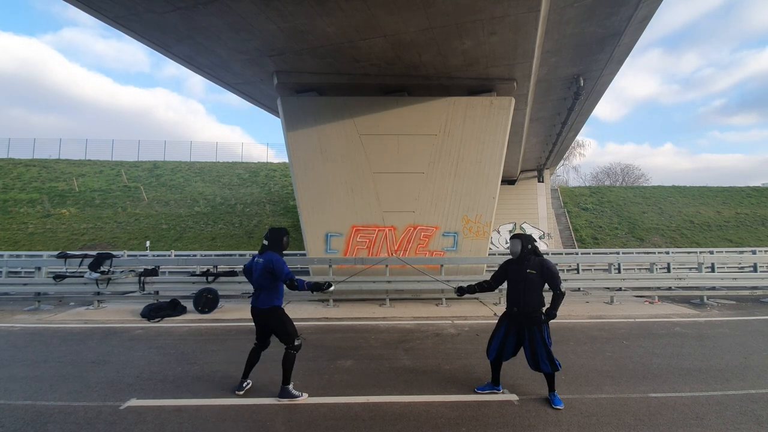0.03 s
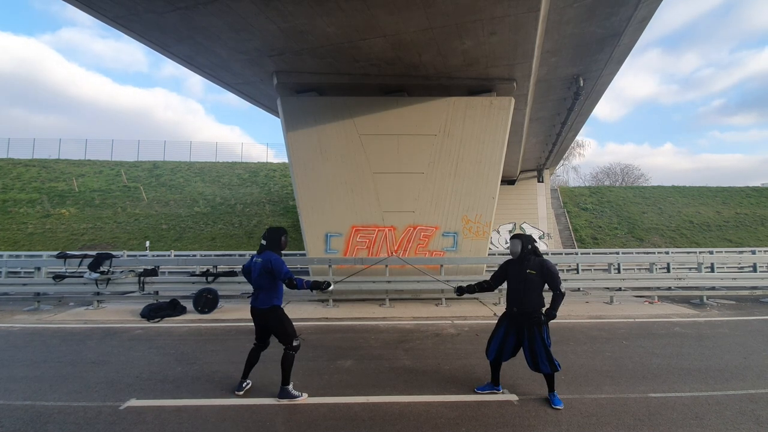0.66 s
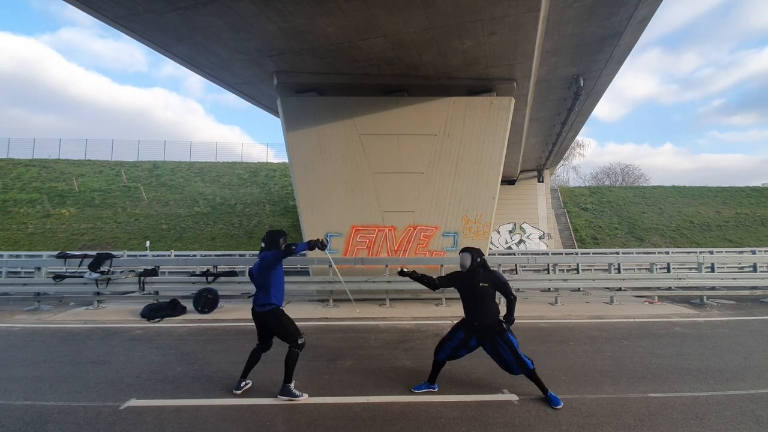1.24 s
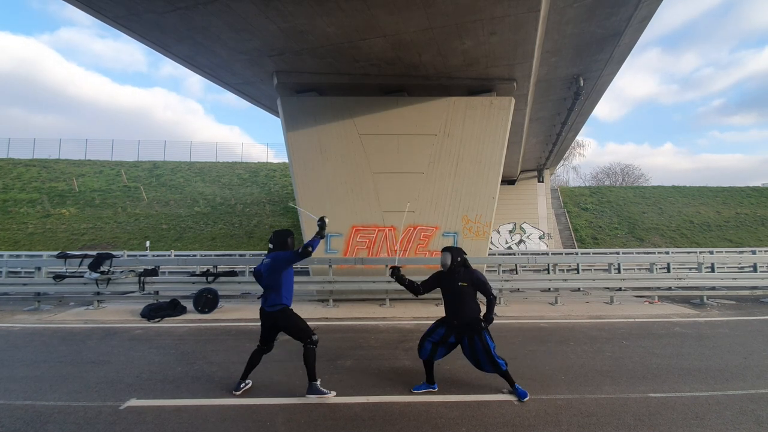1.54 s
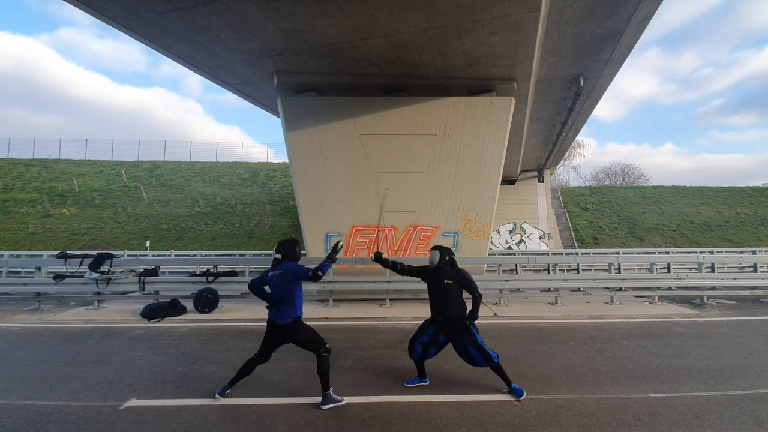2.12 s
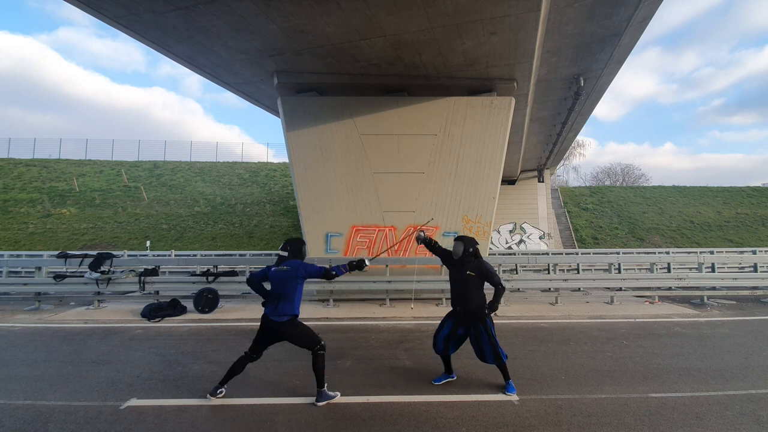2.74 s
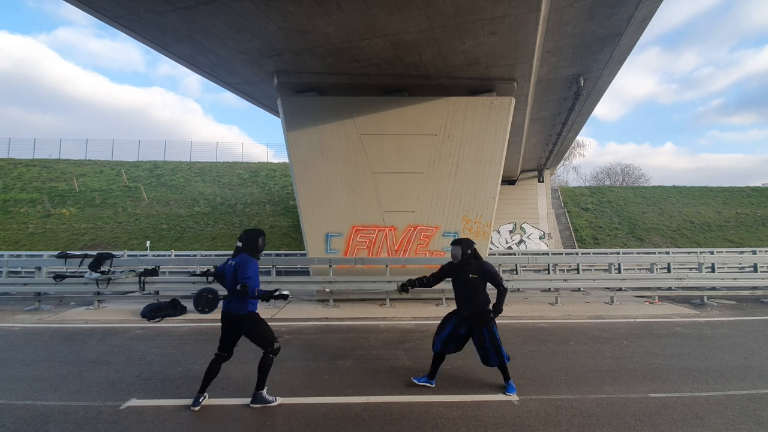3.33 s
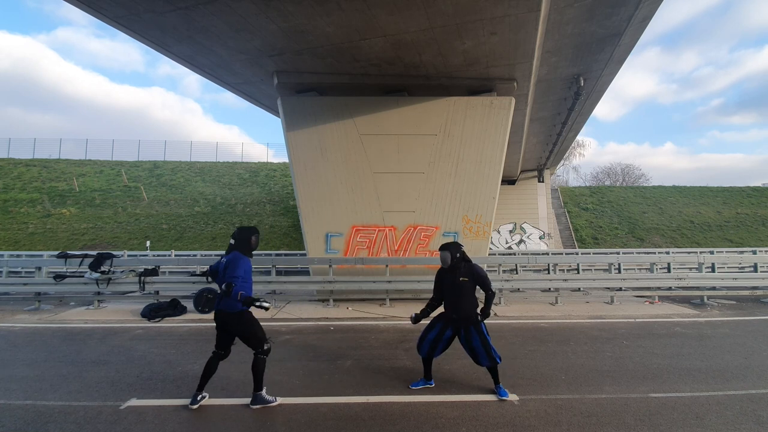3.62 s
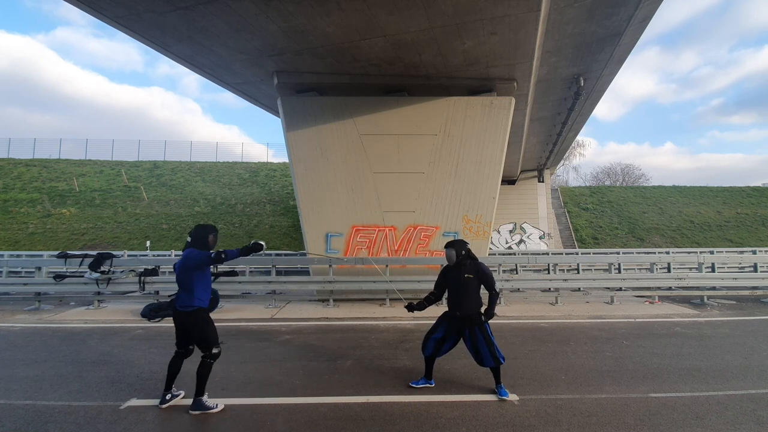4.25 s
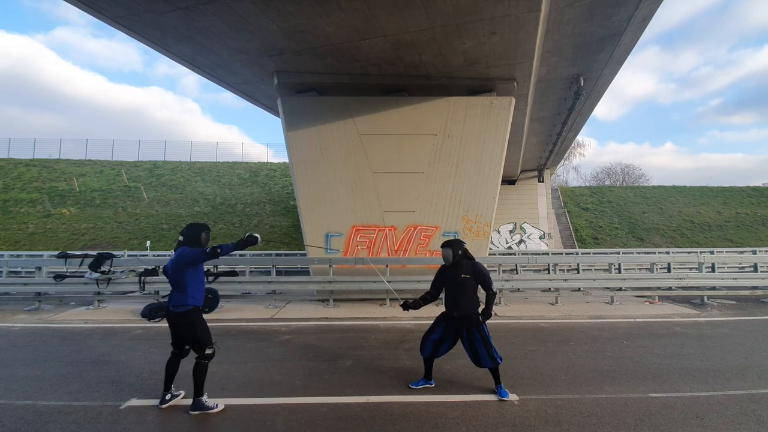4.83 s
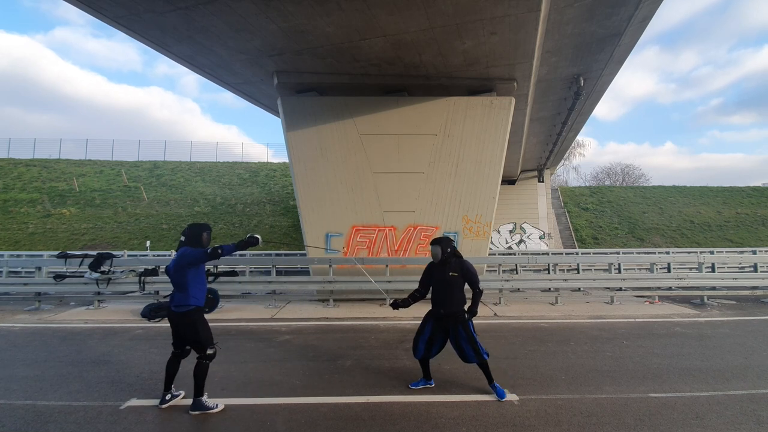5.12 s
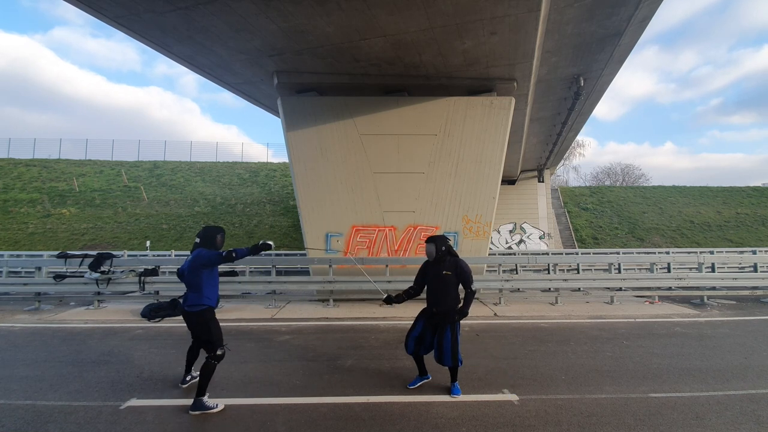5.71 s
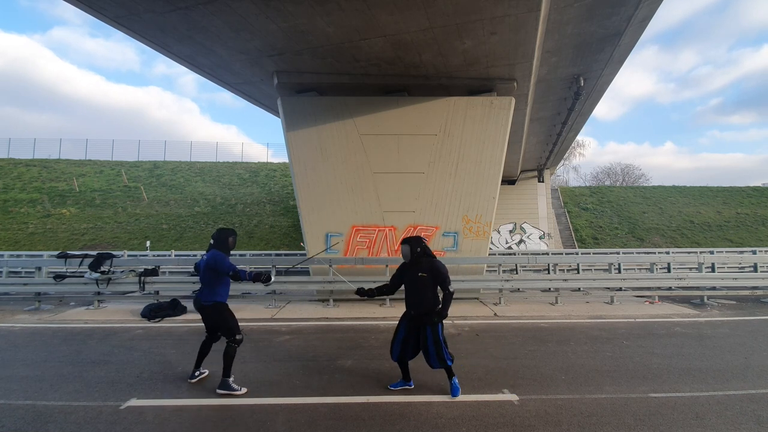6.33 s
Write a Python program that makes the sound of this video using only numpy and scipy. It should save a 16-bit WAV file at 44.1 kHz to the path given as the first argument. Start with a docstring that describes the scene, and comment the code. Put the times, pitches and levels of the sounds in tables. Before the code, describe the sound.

Steel sabres clash and ring briefly under a bridge, with shoes stamping and scuffing and wind buffeting the microphone.

```python
"""Sabre fencing under a bridge

Two fencers spar on the asphalt under a concrete road bridge. Their steel blades grind, snap and
ring briefly, shoes stamp and scuff, jackets swish, and the deck and pier throw the sound back.
Wind buffets the microphone over a faint wash of far traffic."""
import sys
import numpy as np
from scipy import signal
from scipy.fft import rfft, irfft, next_fast_len
from scipy.io import wavfile
from scipy.ndimage import uniform_filter1d

SR = 44100
rng = np.random.default_rng(int(sys.argv[2]) if len(sys.argv) > 2 else 0)


def unload_wav(signal):
    """Save mono or channel-first audio to the path in sys.argv[1] as 16-bit WAV at rate SR, clipped to [-1, 1]."""
    wavfile.write(
        sys.argv[1],
        SR,
        np.round(np.clip(np.atleast_2d(signal).T, -1, 1) * 32767).astype(np.int16),
    )


N = 280900
TIME = np.arange(N) / SR
EDGES_HZ = np.r_[np.geomspace(110, 820, 8), np.geomspace(1000, 17000, 17)]
BAND_HZ = np.sqrt(EDGES_HZ[1:] * EDGES_HZ[:-1])
BAND_FILTERS = [signal.butter(2, pair, "band", fs=SR, output="sos")
                for pair in zip(EDGES_HZ, EDGES_HZ[1:])]
OPPOSITE = np.array([[1], [-1]])   # plus on the left, minus on the right


def from_db(db):
    """Turn decibels into a gain."""
    return 10 ** (np.asarray(db) / 20)


def at_hz(points, hz):
    """Read between rows of (Hz, value) on a log-frequency axis."""
    table = np.array(points)
    return np.interp(np.log(hz), np.log(table[:, 0]), table[:, 1])


def rms_one(x):
    """Scale to an average strength (rms) of 1."""
    return x / np.sqrt(np.mean(x ** 2) + 1e-20)


def add(track, s, sound):
    """Mix a sound into a track, starting at s seconds."""
    start = int(np.clip(round(s * SR), 0, N - 1))
    track[:, start:start + sound.shape[1]] += sound[:, :N - start]


def flicker(rate_hz, size):
    """A smooth random wobble between -2 and 2."""
    slow = signal.sosfilt(signal.butter(2, rate_hz, fs=SR, output="sos"), rng.standard_normal(size))
    return np.clip(rms_one(slow), -2, 2)


def swell(rise, decay):
    """A straight rise and an exponential fall, timed in seconds."""
    t = TIME[:int((rise + 5 * decay + .02) * SR)]
    return np.minimum(t / rise, 1) * np.exp(-np.maximum(t - rise, 0) / decay)


def stereo(mid, side, likeness):
    """Blend two noises into left and right: likeness 1 is identical, 0 unrelated."""
    return np.sqrt(1 + likeness) * mid + np.sqrt(1 - likeness) * side * OPPOSITE


# How alike left and right are under the bridge. Each row: frequency in Hz, likeness from 0 to 1.
LIKENESS = [(100, 1), (700, 0.89), (1500, 0.82), (2000, 0.63), (2800, 0.66), (5600, 0.52), (10000, .17),
            (15000, 0.043)]

def noise_bands(envelope):
    """Stereo noise under an envelope, in bands that each hold the energy a unit click has there."""
    white = rng.standard_normal((2, 2, len(envelope))) * envelope + 1e-18
    bands = []
    for k, sos in enumerate(BAND_FILTERS):
        mid, side = map(rms_one, signal.sosfilt(sos, white[k % 2]))
        gain = np.sqrt((EDGES_HZ[k + 1] - EDGES_HZ[k]) / SR / len(envelope))
        bands.append(gain * stereo(mid, side, at_hz(LIKENESS, BAND_HZ[k])))
    return np.array(bands)


def burst(envelope, band_db):
    """Noise with a given shape in time and a level for each band."""
    return np.tensordot(from_db(band_db), noise_bands(envelope), 1)


def airflow(spectrum, likeness, lump_db=0.0, lump_hz=35):
    """Lasting noise of rms 1; lump_db makes it come in lumps, as when swirls of air pass."""
    size = next_fast_len(N, True)
    white = rng.standard_normal((2, N)) * from_db(lump_db * flicker(lump_hz, N))
    hz = np.maximum(np.fft.rfftfreq(size, 1 / SR), 1)
    mid, side = irfft(rfft(white, size) * from_db(at_hz(spectrum, hz)), size)[:, :N]
    return rms_one(stereo(mid, side, likeness))


# The tone of far traffic. Each row: frequency in Hz, relative level in dB.
TRAFFIC_TONE = [(150, -12), (300, -5), (500, -12), (750, -11), (1150, -14), (1600, -22.5), (2400, -31),
                (3300, -30), (5000, -42), (8000, -40.5), (15000, -40)]

def traffic(level_db=-64.5):
    """Far vehicles blur into one steady, dull wash."""
    return from_db(level_db) * airflow(TRAFFIC_TONE, likeness=0.23)


# Gusts that bump the microphone. Each row: time of the crest in seconds, time to build and to die
# in seconds, relative levels of buffeting and of flutter in dB.
GUSTS = [(.2, .08, -42.5, -59), (.352, 0.022, -33.5, -47), (0.486, 0.026, -36.5, -47),
         (.725, 0.055, -38, -47), (1.24, 0.032, -48, -40), (1.35, 0.022, -34.5, -45.5),
         (1.5, 0.067, -39.5, -40.5), (1.665, 0.021, -32, -40), (1.815, 0.022, -39, -54),
         (2.21, 0.027, -45, -50.5), (2.755, 0.034, -40.5, -50), (3.023, 0.023, -31, -45),
         (3.35, 0.14, -46.5, -58), (3.64, 0.058, -42.5, -56), (3.98, 0.083, -45, -51),
         (4.195, 0.018, -38.5, -55), (4.46, 0.028, -39.5, -54), (4.876, 0.039, -36, -51.5),
         (5.369, .04, -40, -55), (5.56, 0.029, -34.5, -48), (5.745, 0.044, -30.5, -44.5),
         (5.95, 0.062, -38, -48), (6.199, 0.046, -36, -46)]

def gusts(boost_db=2):
    """Each gust swells and dies like a bell curve; gives the strength of buffeting and of flutter."""
    power = np.zeros((2, N))
    for crest, width, buffet_db, flutter_db in GUSTS:
        bell = np.exp(-np.minimum(abs(TIME - crest) / width, 10) ** 2)
        power += (from_db([[buffet_db], [flutter_db]]) * bell) ** 2
    return from_db(boost_db) * np.sqrt(power)


# The tones of big swirls (buffeting) and small ones (flutter).
# Each row: frequency in Hz, relative level in dB.
BUFFET_TONE = [(20, -14.5), (35, -4.5), (60, 4), (85, 3), (115, -3.5), (160, -14.5), (260, -45),
               (500, -71.5)]
FLUTTER_TONE = [(60, -22), (110, -7), (150, -2.5), (220, -7), (320, -8.5), (480, -19), (800, -38),
                (2000, -61.5), (4000, -83.5)]
# The breeze between gusts. Each row: time in seconds, relative levels of buffeting and flutter in dB.
BREEZE = [(0.0, -49, -54.5), (0.62, -48, -52.5), (0.85, -59, -68), (1.08, -52, -64), (1.45, -46, -54),
          (1.67, -47, -53), (1.9, -52.5, -61.5), (3.39, -54.5, -63), (3.92, -61, -68), (4.54, -47, -60),
          (4.95, -51, -61), (5.78, -43.5, -57.5), (6.14, -51, -63.5), (6.37, -47, -57.5)]

def wind(breeze_boost_db=4, smooth_s=0.065, pans_db=(-0.06, 0.65)):
    """Big and small swirls of air hit the microphone; breeze and gusts set their strength."""
    times, *breezes_db = np.transpose(BREEZE)
    buffet = airflow(BUFFET_TONE, likeness=0.27, lump_db=6.0, lump_hz=22)
    flutter = airflow(FLUTTER_TONE, likeness=0.011, lump_db=5.5, lump_hz=33)
    out = np.zeros((2, N))
    for swirls, breeze_db, gust, pan_db in zip((buffet, flutter), breezes_db, gusts(), pans_db):
        breeze = from_db(np.interp(TIME, times, breeze_db) + breeze_boost_db)
        power = uniform_filter1d(np.mean(swirls ** 2, axis=0), int(smooth_s * SR))
        evened = swirls / np.sqrt(power + 1e-12)
        out += evened * np.hypot(breeze, gust) * from_db(pan_db * OPPOSITE)
    return out


# How long the first reflections and the lingering tail last.
# Each row: frequency in Hz, seconds to fade by 60 dB.
EARLY_FADE = [(200, 0.73), (1500, 0.54), (4000, 0.56), (8000, 0.38), (15000, 0.24)]
LATE_FADE = [(200, 3.4), (700, 1.72), (1500, 1.14), (3000, 0.95), (4200, 0.53), (6000, .68), (15000, 0.5)]

def bridge(x, delay_s=0.017, build_s=0.0043, gap_db=-14, wet_db=17, late_db=-14, stretches=12):
    """Dense reflections from deck, pier and road build up and die, the treble first."""
    t = TIME[:SR]
    early = from_db(-60 * t / at_hz(EARLY_FADE, BAND_HZ)[:, None])
    late = from_db(late_db - 60 * t / at_hz(LATE_FADE, BAND_HZ)[:, None])
    arrived = np.maximum(from_db(gap_db), .5 + .5 * np.tanh((t - delay_s) / build_s))
    envelope = from_db(wet_db) * np.hypot(early, late) * arrived
    bunches = from_db(1.43 * flicker(rate_hz=220, size=SR))   # few walls: reflections come in bunches
    reflections = np.tile(noise_bands(bunches), 2)
    out = np.zeros((2, N))
    # the fencers keep moving, so each stretch of time meets another pattern of reflections
    shifts = np.linspace(0, SR, stretches).astype(int)
    for shift, part in zip(shifts, np.array_split(np.arange(N), stretches)):
        response = np.einsum("bct,bt->ct", reflections[:, :, shift:shift + SR], envelope)
        add(out, part[0] / SR, signal.fftconvolve(x[:1, part], response, axes=1))
    return out


# Single echoes. Each row: delay in seconds, gain in dB.
ECHOES = [(0.0163, -11.5), (0.0412, -15.5)]

def echoes(x):
    """Hard surfaces nearby each return one distinct copy."""
    out = np.zeros((2, N))
    for delay, db in ECHOES:
        add(out, delay, from_db(db) * x)
    return out


# The tone of sliding cloth. Each row: frequency in Hz, relative level in dB.
CLOTH_TONE = [(300, -3), (1200, 5.5), (3000, -1), (4200, -10), (5200, -5.5), (8000, -12), (10500, -9.5),
              (15000, -7)]
# Arm movements. Each row: start in seconds, relative level in dB, rise and decay in seconds.
SWISHES = [(1.018, -22.5, 0.29, 0.031), (4.42, -31.5, 0.14, 0.17), (5.07, -21.5, 0.081, 0.18),
           (5.998, -25.5, 0.0025, 0.12)]

def jackets():
    """Padded jackets slide and swish as the arms move."""
    out = np.zeros((2, N))
    for start, db, rise, decay in SWISHES:
        add(out, start, burst(swell(rise, decay), db + at_hz(CLOTH_TONE, BAND_HZ)))
    return out


# The tone of a sole on asphalt. Each row: frequency in Hz, relative level in dB.
SOLE_TONE = [(80, -13), (250, -13), (420, -1.5), (700, -3.5), (980, -2.5), (1280, -1), (1650, -2),
             (2400, -2.5), (3100, 1.5), (4200, -5.5), (6000, 1), (9500, -0.5), (15000, 0.5)]
# Short stamps and long scuffs. Each row: start in seconds, thud in dB, pitch of the hollow under
# the sole in Hz, slap in dB, decay in seconds. Thud and slap are added to the sole's tone.
STEPS = [(.648, -7, 440, -46, 0.02), (1.181, -7, 875, -45, .0076), (1.211, -13, 378, -43, 0.032),
         (1.2548, -6, 805, -9, 0.0029), (1.729, -0.5, 790, -6, .004), (1.754, -2.5, 810, -9, 0.0029),
         (2.572, -0.5, 600, -1.5, .0025), (2.613, -4.5, 533, -20, .022), (3.144, -1.5, 603, 1, 0.0097),
         (3.158, 14, 810, 8.5, 0.063), (3.606, 4.5, 620, 4.5, 0.01), (3.843, 2, 449, -40, .005),
         (3.872, -8, 509, -33, .035), (4.057, -3, 614, -18.5, .012), (4.192, -6.5, 900, -13.5, 0.024),
         (5.274, 9, 730, 5, 0.027), (5.831, -10.5, 600, -10.5, 0.022), (5.86, -8.5, 693, -4.5, .005),
         (6.187, 2.5, 580, -9, 0.017), (6.216, 0, 610, -2.5, .03)]

def footsteps(hollow_db=5, hollow_octaves=0.24, full_slide_s=0.012):
    """A step is the thud of the heel, the slap of the sole and the grit under it."""
    out = np.zeros((2, N))
    for start, thud_db, hollow_hz, slap_db, decay in STEPS:
        dragged = min(decay / full_slide_s, 1)   # a shorter contact drags less grit along
        grit_db = -23 + 0.59 * slap_db + 20 * np.log10(dragged)   # grit crunches with the slap
        balance = [(700, thud_db), (2000, slap_db), (7000, grit_db)]
        hollow = hollow_db * np.exp(-(np.log2(BAND_HZ / hollow_hz) / hollow_octaves) ** 2)
        band_db = at_hz(SOLE_TONE, BAND_HZ) + at_hz(balance, BAND_HZ) + hollow
        rise = .35 * decay   # a sole that slides longer takes longer to grip
        add(out, start, burst(swell(rise, decay), band_db))
    return out


# Snaps of the blade edges. Each row: start in seconds, relative level in dB, centre frequency in Hz,
# decay in seconds.
BITES = [(1.3095, 17.5, 13900, 0.0019), (1.7912, 15, 10000, 0.0021), (1.803, 19, 14000, .001),
         (2.1792, 23, 3220, .002), (3.2835, 22.5, 12050, 0.0022), (3.299, 11.5, 6500, 0.0023),
         (3.325, 9.5, 8650, 0.0019), (3.376, 13.5, 2360, 0.017), (6.266, 5, 15000, 0.0038)]

def edge_bites(width_octaves=0.36, off_peak_db=-17, bass_db=-30):
    """One edge bites into the other with a bright snap."""
    out = np.zeros((2, N))
    for start, db, hz, decay in BITES:
        peak = np.exp(-(np.log2(BAND_HZ / hz) / width_octaves) ** 2)
        band_db = db + off_peak_db * (1 - peak) + bass_db * (BAND_HZ < 1000)
        add(out, start, burst(swell(0.00016, decay), band_db))
    return out


# The blades' own notes. Each row: pitch in Hz, relative level in dB, seconds to fade by 60 dB.
BLADE_NOTES = [(1081, -0.5, 0.19), (1202, -3.5, 0.26), (1272, 1, 0.16), (1505, -2.5, 0.18),
               (1650, -2.5, 0.14), (1746, -4.5, 0.18), (1882, -0.5, 0.59), (1918, -2, 0.32),
               (1960, 1.5, .2), (2560, -2.5, 0.16), (2663, 1, 0.22), (2840, -4.5, .22), (3040, -0.5, 0.3),
               (3280, -5, 0.12), (3530, -6.5, 0.077), (4140, 3, 0.072), (4370, -3, 0.29), (5526, 4, 0.073),
               (6610, -2.5, 0.09), (6980, 7, .05), (7680, -2.5, 0.053), (8970, 1, 0.04),
               (10790, -4.5, 0.045), (12800, 0.5, 0.029), (13740, -3, 0.044), (14230, 0, .04),
               (14460, 1.5, .05), (15000, -1, .04)]

def blade_ring(colour, favoured_hz, extra_db, ring_db=-50.0, spread_db=1.25):
    """Every blow wakes all the notes; where it lands on the blade decides which ones sing out."""
    hz, note_db, fade_s = np.transpose(BLADE_NOTES)
    singing = np.isin(np.arange(len(hz)), [np.argmin(abs(hz - pitch)) for pitch in favoured_hz])
    chance_db = spread_db * rng.standard_normal(len(hz))
    strength = from_db(ring_db + note_db + at_hz(colour, hz) + extra_db * singing + chance_db)
    stereo_shift = np.arccos(at_hz(LIKENESS, hz)) / 2 * rng.choice([-1, 1], len(hz))
    phases = rng.uniform(0, 2 * np.pi, len(hz)) + stereo_shift * OPPOSITE
    fading_notes = np.exp(np.outer(2j * np.pi * hz - np.log(1000) / fade_s, TIME[:SR // 4]))
    return ((strength * np.exp(1j * phases)) @ fading_notes).imag


def clack(band_db, size=512):
    """A crash summed over all directions: its peaks and holes even out into one smooth pulse."""
    gain = from_db(np.interp(np.fft.rfftfreq(size, 1 / SR), BAND_HZ, band_db))
    return np.roll(irfft(gain), size // 4)[None]


# The tone of steel hitting steel. Each row: frequency in Hz, relative level in dB.
CRASH_TONE = [(100, -36.5), (300, -17), (550, -8.5), (850, -10), (1200, 1), (1900, 5), (2600, 1.5),
              (3600, 1), (5200, -3), (8200, -6.5), (9600, -5), (12000, -4), (15000, -3.5)]
# Blade on blade. Each row: start in seconds, relative level in dB, extra bass and treble in dB,
# contact time in seconds, gain towards the microphone in dB, two favoured pitches in Hz, their extra dB.
CLASHES = [(1.308, 15, 2, 4.5, .006, -10.5, 5445, 2560, 9.5),
           (1.784, 19.5, 0.5, 0, 0.0089, 0.5, 1280, 1446, 8.5),
           (2.1759, 21.5, -2.5, -1, 0.0048, -0.5, 2518, 1760, 3.5),
           (2.7036, 22, 2, 0.5, 0.0069, -3.5, 1610, 1280, 6),
           (3.2797, 13.5, 6.5, 5.5, 0.0032, -8, 4060, 11860, 12.5),
           (5.2850, -5.5, 6, -8.5, 0.015, -5, 1228, 3043, 12.5),
           (6.2540, 8, 3.5, 6, 0.014, -1.5, 2710, 3320, 11.5)]

def sabre_clashes(release_s=0.0057, rattle_db=-18, rattle_s=0.033, crash_around_db=-10):
    """Edges grind, hilts rattle, blades ring; gives the sound aimed at us and that sent all round."""
    aimed, around = np.zeros((2, 2, N))
    t = TIME[:SR // 4]
    for start, db, bass_db, treble_db, contact_s, aim_db, *favoured_hz, extra_db in CLASHES:
        colour = [(600, db + bass_db), (1200, db), (3000, db), (12000, db + treble_db)]
        band_db = at_hz(CRASH_TONE, BAND_HZ) + at_hz(colour, BAND_HZ)
        grind = np.exp(-np.maximum(t - contact_s, 0) / release_s)
        rattle = from_db(rattle_db) * np.exp(-t / rattle_s)
        crash = burst(grind + rattle, band_db)
        ring = blade_ring(colour, favoured_hz, extra_db)
        add(aimed, start, from_db(aim_db) * (crash + ring))
        add(around, start, ring + from_db(crash_around_db) * crash)
        add(around, start, clack(band_db))
    return aimed, around


def scene():
    """The bout and its echoes, a touch to the right, with wind and far traffic."""
    clashes_aimed, clashes_around = sabre_clashes()
    bites = edge_bites()
    movement = footsteps() + jackets()
    direct = clashes_aimed + bites + movement
    around = clashes_around + from_db(-9) * bites + from_db(-1) * movement
    bout = direct + echoes(direct) + bridge(around)
    return bout * from_db([[-.4], [.4]]) + wind() + traffic()


def record(dry, cutoff_hz=15850):
    """Round off the tallest peaks and cut the highest treble."""
    rounded = 0.97 * np.tanh(dry / 1.14)
    return signal.sosfilt(signal.ellip(10, .2, 95, cutoff_hz, fs=SR, output="sos"), rounded)


dry = scene()
out = record(dry)
unload_wav(out)
```